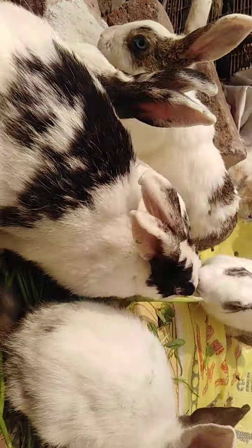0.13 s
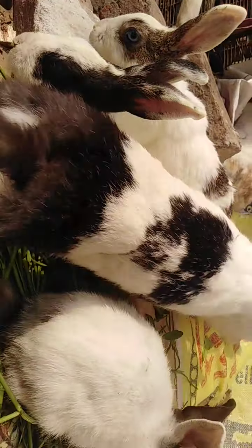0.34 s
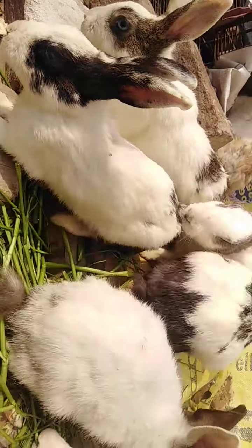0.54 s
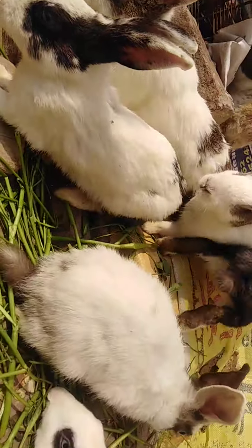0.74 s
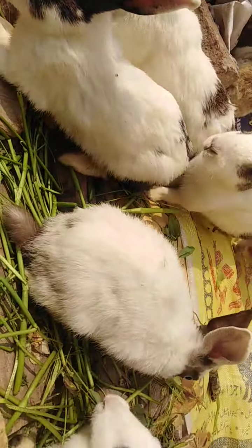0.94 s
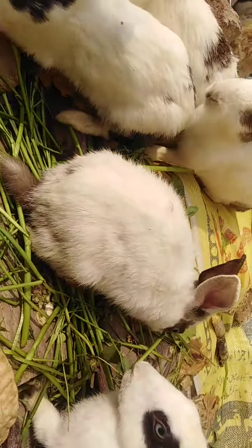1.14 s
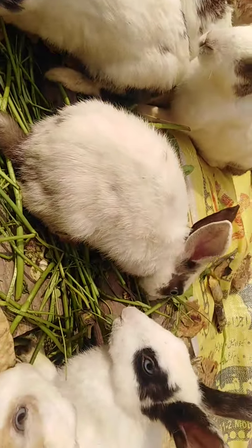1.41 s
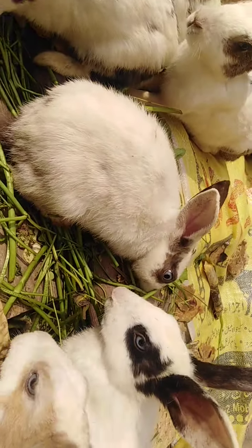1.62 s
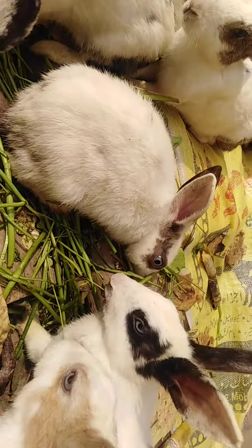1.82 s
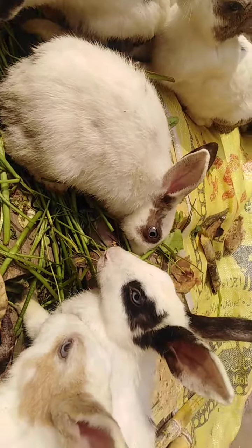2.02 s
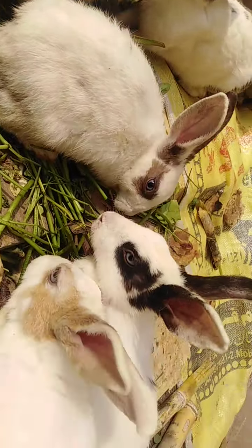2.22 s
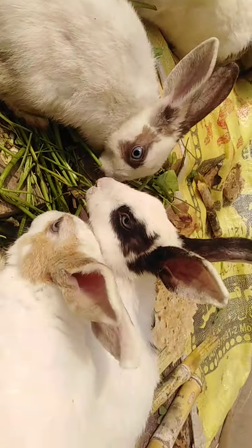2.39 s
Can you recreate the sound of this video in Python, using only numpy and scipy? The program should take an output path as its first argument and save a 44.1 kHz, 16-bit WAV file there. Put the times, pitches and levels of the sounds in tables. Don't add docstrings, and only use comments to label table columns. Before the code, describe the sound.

Rabbits chew and tear greens close by, with swishing leaves and crisp stalk cracks at 0.2 s. Around 0.5 s one hops, paws thudding and scuffing on a woven sack until about 0.7 s. Sparrows chirp left, in bursts near 0.7, 1.6 and 2.5 s, echoing off walls. Two snaps follow 1.0 s, a soft thud at 1.7 s; chewing fades over faint motor hum and traffic rumble.

```python
import sys
import numpy as np
from scipy import signal
from scipy.fft import rfft, irfft, next_fast_len
from scipy.io import wavfile
from scipy.ndimage import uniform_filter1d, map_coordinates

SR = 44100
rng = np.random.default_rng(int(sys.argv[2]) if len(sys.argv) > 2 else 0)


def makeup_ratio(level_db):
    decades = np.asarray(level_db, float) / 20
    return 10 ** decades


def bounce(signal):
    frames = np.transpose(np.atleast_2d(signal))
    limited = np.clip(frames, -1, 1)
    pcm = np.round(limited * 32767).astype(np.int16)
    wavfile.write(sys.argv[1], SR, pcm)


N = 112454


def unit(x):
    return x / np.sqrt(np.mean(x ** 2) + 1e-20)


def noise(*shape):
    return rng.standard_normal(shape)


def along(points, hz):
    point_hz, value = np.transpose(points)
    return np.interp(np.log(hz + 1), np.log(point_hz + 1), value)


def level_curve(rows):
    start_s, level_db = np.transpose(rows)
    return np.interp(np.arange(N) / SR, start_s, level_db, left=-120, right=-120)


def wobble(rate):
    return map_coordinates(noise(int(N * rate / SR) + 4), [np.arange(N) * rate / SR])


def filtered(x, response):
    size = next_fast_len(N + 8192)
    return irfft(rfft(x, size) * response(np.fft.rfftfreq(size, 1 / SR)), size)[..., :N]


def coloured(x, points):
    return filtered(x, lambda hz: makeup_ratio(along(points, hz)))


def smoothed(x, bins, frames):
    return uniform_filter1d(uniform_filter1d(x, bins, axis=-2), frames, axis=-1)


def patchy(x, patchy_db, wide=4, long=6):
    z = signal.stft(x, nperseg=512)[2]
    field = smoothed(noise(*z.shape[-2:]), wide, long)
    return signal.istft(z * makeup_ratio(patchy_db * unit(field)), nperseg=512)[1][..., :N]


def add(out, s, x):
    i = max(round(s * SR), 0)
    out[..., i:i + x.shape[-1]] += x[..., :out.shape[-1] - i]


def pan(left_over_right_db):
    return makeup_ratio(np.array([[left_over_right_db / 2], [-left_over_right_db / 2]]))


# (start_s, level_db)
HUM_LEVELS = [(0, -56.5), (.1, -49), (.15, -54), (.3, -47), (.44, -42.5), (.5, -48), (.75, -50),
              (.84, -50.5), (1.05, -44.5), (1.33, -50), (1.45, -65), (1.6, -93), (1.64, -49), (1.8, -47.5),
              (1.9, -56.5), (2.26, -68.5), (2.31, -49.5), (2.55, -61.5)]


def machine_hum():
    hum_hz, width_hz, fuzz_db, left_over_right_db = 386.5, 56.6, -2.5, 9
    t = np.arange(N) / SR
    tone = np.sqrt(2) * np.sin(2 * np.pi * hum_hz * t + 1.2 * wobble(14))
    tone = tone * makeup_ratio(2.5 * wobble(25))
    fuzz = unit(filtered(noise(N), lambda hz: np.exp(-((hz - hum_hz) / width_hz) ** 2)))
    return pan(left_over_right_db) * makeup_ratio(level_curve(HUM_LEVELS) - 7.0) * (tone + makeup_ratio(fuzz_db) * fuzz)


# (pitch_hz, level_db per Hz)
STREET_COLOUR = [(25, -14.5), (45, -7.5), (97, -1.5), (225, -11), (400, -8.5), (520, -35.5), (1700, -59),
                 (2600, -61)]


def street():
    hiss = noise(3, N)
    rumble = coloured(hiss[0] + 0.35 * hiss[1:], STREET_COLOUR)
    return makeup_ratio(-55) * unit(patchy(rumble, patchy_db=3, wide=2, long=12))


# (pitch_hz, level_db per Hz)
AIR_COLOUR = [(1000, 1.5), (4000, -13), (14000, -4)]


def air():
    return makeup_ratio(-69.5) * unit(patchy(coloured(noise(2, N), AIR_COLOUR), patchy_db=4, wide=10))


# (pitch_hz, time to fall 60 dB in s)
YARD_ECHO = [(1500, 0.54), (4500, 0.82), (8000, 0.34)]


def yard(events):
    left_late_s, echo_late_s, echo_db = 0.00027, 0.0034, 0
    out = np.zeros((2, N))
    for s, x in events:
        hz, t, z = signal.stft(noise(2, SR // 2), SR, nperseg=256)
        fading = makeup_ratio(-60 * t / along(YARD_ECHO, hz)[:, None])
        tail = signal.istft(z * fading, SR, nperseg=256)[1]
        tail = tail / np.linalg.norm(tail[0])
        add(out[0], s + left_late_s, x)
        add(out[1], s, x)
        add(out, s + echo_late_s, makeup_ratio(echo_db) * signal.fftconvolve(x[None], tail, axes=1))
    return out


# (start_s, pitch_hz, level_db)
KNOCK_EVENTS = [(0.284, 1043, -36.5), (0.746, 1967, -33.5), (.748, 765, -37), (1.38, 667, -46.5),
                (1.385, 1240, -45.5), (1.587, 2184, -39.5), (1.589, 1800, -52), (1.712, 1240, -54),
                (1.899, 1930, -48), (2.079, 1850, -47.5), (0.208, 883, -53), (.035, 1830, -63),
                (1.6, 2680, -39.5), (1.645, 2900, -38), (2.002, 1036, -46.5)]


def knocks():
    loss_db = 1.6
    t = np.arange(1800) / SR
    events = []
    for s, hz, db in KNOCK_EVENTS:
        swell = 1 - np.exp(-t * hz / 2)
        events.append((s, makeup_ratio(db - loss_db * t * hz) * swell * np.sin(2 * np.pi * hz * t)))
    return yard(events)


# (start_s, length_s, start_pitch_hz,
# end_pitch_hz, level_db)
SPARROW_NOTES = [(.0, 0.016, 5600, 3120, -33), (0.028, 0.046, 4695, 3230, -46),
                 (0.673, 0.019, 6690, 6430, -37), (0.689, 0.012, 4650, 5160, -33),
                 (0.701, 0.0165, 5960, 5360, -31), (0.713, 0.032, 5100, 3608, -39),
                 (0.746, 0.016, 4300, 5405, -35), (0.757, 0.025, 3050, 4174, -35.5),
                 (1.548, 0.012, 3250, 3340, -54), (1.564, 0.03, 3600, 5370, -45.5),
                 (1.582, 0.038, 4200, 4703, -38.5), (1.612, .05, 3686, 4290, -45),
                 (1.599, 0.044, 6800, 5960, -39), (1.615, 0.035, 4750, 5564, -34),
                 (1.651, 0.047, 5300, 3778, -36.5), (1.697, 0.038, 4250, 2795, -32),
                 (2.446, 0.023, 4900, 6194, -38), (2.479, 0.035, 5600, 4930, -42),
                 (2.508, .022, 3350, 4400, -41.5), (2.516, 0.025, 5790, 4360, -34),
                 (0.054, 0.017, 5300, 4940, -53), (0.924, 0.019, 3435, 3310, -42),
                  (0.919, 0.019, 3143, 2855, -44.5), (.948, 0.041, 3050, 2480, -44),
                  (1.078, 0.039, 3830, 3570, -42), (1.089, 0.036, 3293, 2915, -41),
                  (1.12, 0.059, 4156, 5380, -43.5), (1.277, 0.04, 5050, 4960, -44.5),
                  (1.298, 0.049, 4850, 3830, -47.5), (1.341, 0.044, 5300, 4270, -46),
                  (1.397, 0.052, 5100, 4285, -52.5), (0.803, 0.054, 4200, 3320, -49.5),
                  (1.763, 0.044, 5160, 5530, -46), (1.9, 0.033, 6010, 4016, -39.5),
                  (1.911, 0.034, 3700, 4937, -41), (2.013, 0.0278, 3455, 2842, -41),
                  (2.025, 0.11, 4926, 4177, -46), (2.063, 0.044, 3046, 3537, -43),
                  (2.091, 0.11, 5370, 5026, -43.5), (2.201, 0.043, 4720, 5795, -45.5),
                  (2.337, 0.06, 3350, 2933, -54), (2.407, 0.053, 3240, 2880, -56)]


def sparrows():
    full_voice_db = -39
    second_ratio, second_db, overtone_db = 0.83, -6.5, -24
    rasp = makeup_ratio(4 * np.tanh(wobble(110)))
    warble = 0.055 * wobble(500)
    notes = []
    for s, length, start_hz, end_hz, db in SPARROW_NOTES:
        now = slice(int(s * SR), int((s + length) * SR))
        u = np.linspace(0, 1, len(rasp[now]))
        effort = min(makeup_ratio(db - full_voice_db), 1)
        hz = (start_hz + (end_hz - start_hz) * u) * (1 + effort * warble[now])
        phase = 2 * np.pi * np.cumsum(hz) / SR
        voice = np.sin(phase) + makeup_ratio(overtone_db) * np.sin(2 * phase)
        voice = voice + effort * makeup_ratio(second_db) * np.sin(second_ratio * phase)
        swell = np.abs(np.sin(np.pi * u)) ** 0.51
        notes.append((s, makeup_ratio(db) * rasp[now] * swell * voice))
    return yard(notes) * pan(7)


# (start_s, peak level_db, pitch_hz, time to fall 60 dB in s, left over right in dB)
PAW_THUDS = [(0, -40, 201.3, 0.42, -20.5), (0.021, -38, 132, 0.22, -14.5), (0.436, -22, 102, 0.096, -4),
             (0.497, -37, 122, 0.04, -9), (0.536, -10, 452, 0.021, -5), (0.543, -8.5, 433, 0.022, 1.5),
             (.553, -36.5, 546, 0.042, -24), (0.576, -33.5, 401, 0.19, 4), (0.598, -28.5, 195, 0.063, -12),
             (.625, -34, 242, 0.29, -2), (0.647, -29.5, 192, 0.11, -8), (0.872, -33, 106, 0.13, 1),
             (0.962, -38.5, 106, 0.17, 2), (1.3, -38.5, 107.8, 0.23, 15), (1.665, -37.5, 195.7, 0.21, 2),
             (1.731, -15, 113, 0.04, 4), (1.787, -42, 317.7, 0.22, 3.5), (2.14, -42, 273.6, 0.32, -4)]


def paw_thuds():
    out, t = np.zeros((2, N)), np.arange(SR // 3) / SR
    for s, db, hz, t60, left_over_right_db in PAW_THUDS:
        wander = uniform_filter1d(np.cumsum(noise(len(t))), size=int(SR / hz))
        drift = 0.5 * wander * np.sqrt(hz / SR)
        swell = 1 - np.exp(-t * hz * 0.82)
        thud = makeup_ratio(db - 60 * t / t60) * swell * np.sin(2 * np.pi * hz * t + drift)
        add(out, s, pan(left_over_right_db) * thud)
    return out


# (start_s, level_db)
SCUFF_LEVELS = [
    (.24, -64.5),
    (.33, -55.5),
    (.42, -49.5),
    (.49, -45.5),
    (.55, -38.5),
    (.64, -43),
    (.7, -54),
    (.95, -58.5),
    (1.1, -69),
    (1.25, -82),
]
# (pitch_hz, level_db per Hz)
SACK_COLOUR = [(50, -3.5), (110, 1), (400, 0), (600, -11), (2500, -21.5), (4000, -39)]


def sack_scuffs():
    hiss = noise(3, N)
    scuff = unit(coloured(hiss[0] + 0.6 * hiss[1:], SACK_COLOUR))
    return scuff * makeup_ratio(level_curve(SCUFF_LEVELS) + 2.5 * np.tanh(wobble(70)))


# (start_s, peak level_db, pitch_hz, cycles to die)
STALK_SNAPS = [(0.1972, -20.5, 5740, 6.3), (0.2015, -14, 6300, 5), (0.2038, -11, 7030, 1.7),
               (0.435, -52.5, 1146, 41), (0.5047, -40, 2570, 2.4), (0.537, -21, 1020, 2.46),
               (.5425, -29.5, 894, 2.9), (.552, -27.5, 1810, 2.6), (.567, -30, 2400, 2.3),
               (.598, -43, 960, 3.2), (.636, -63, 7000, 2.4), (.748, -35.5, 1990, 7.2),
               (0.823, -30, 6940, 5.6), (1.0248, -18.5, 8600, 2.35), (1.044, -19, 6200, 2.8),
               (1.161, -38.5, 8800, 0.94), (2.11, -35.5, 10200, 7.4)]


def snaps():
    crack_db, crack_t60_s = -19.5, 0.0014
    out, t = np.zeros((2, N)), np.arange(600) / SR
    for s, db, hz, cycles in STALK_SNAPS:
        swell = 1 - np.exp(-t * hz * 0.5)
        ring = np.sin(2 * np.pi * hz * t) * makeup_ratio(-20 * t * hz / cycles) * swell
        crack = np.diff(noise(2, len(t) + 1)) * makeup_ratio(crack_db - 60 * t / crack_t60_s)
        add(out, s, makeup_ratio(db + 12.0) * (ring * [[1], [0.7]] + crack))
    return out


# (peak start_s, rise_s, time to fall 60 dB in s, level_db, stalk body over leaf in dB)
GREEN_BITES = [(0, .01, 0.46, -51.5, 2), (0.146, 0.0078, 0.32, -49.5, -6.5),
               (0.202, 0.0095, 0.47, -45, -1.5), (0.344, 0.07, 0.63, -38, 1.5),
               (0.433, 0.0062, 0.83, -46, 5), (0.507, 0.0068, 0.11, -36, 2.5), (0.56, 0.015, 0.22, -44, 4),
               (0.641, 0.023, 0.85, -40.5, -2), (0.839, 0.043, 0.78, -45, -3.5), (.95, 0.27, 1, -51.5, 0.5),
               (1.044, 0.044, 0.48, -42.5, 2), (1.164, 0.0056, 0.29, -47.5, -7),
               (1.255, 0.019, 0.24, -39.5, -3.5), (1.469, 0.022, 0.67, -54, -9),
               (1.705, 0.03, 0.32, -44, -4), (1.897, 0.015, 0.44, -45, 0), (1.93, 0.025, 0.12, -55, 1),
               (2.116, 0.006, 0.43, -52.5, -3.5), (2.215, 0.0075, 0.54, -57.5, 6),
               (2.489, 0.026, 0.88, -63.5, 13)]
# (pitch_hz, level_db per Hz)
LEAF_COLOUR = [(5500, -21), (7000, -2), (8500, 0.5), (11500, -1), (14300, 0)]
# (pitch_hz, level_db per Hz)
STALK_COLOUR = [(900, -54), (1700, -13), (3000, -1), (6000, -0.5), (8000, -10), (10000, -91.5)]


def bites():
    grains_per_s, grain_spread_db, grain_db = 2500, 2, -5
    t, leaf_power, stalk_power = np.arange(N) / SR, 0, 0
    for s, rise, t60, db, body_db in GREEN_BITES:
        rising = np.exp(-((t - s) / rise) ** 2)
        dying = makeup_ratio(-60 * np.abs(t - s) / t60) ** 2
        power = makeup_ratio(2 * db) * np.where(t < s, rising, dying)
        leaf_power = leaf_power + power
        stalk_power = stalk_power + power * makeup_ratio(2 * body_db)
    hit = rng.random((2, N)) < grains_per_s / SR
    grains = hit * noise(2, N)
    grains = unit(grains * makeup_ratio(grain_spread_db * rng.exponential(size=(2, N))))
    fibres = patchy(noise(2, N) + makeup_ratio(grain_db) * grains, patchy_db=4.0, wide=39)
    leaf = unit(coloured(fibres, LEAF_COLOUR)) * np.sqrt(leaf_power) * pan(-4.5)
    stalk = unit(coloured(fibres, STALK_COLOUR)) * np.sqrt(stalk_power) * pan(3)
    return (leaf + stalk) * makeup_ratio(0.31 * wobble(40.96))


def scene():
    birds_and_chewing = sparrows() + bites() + snaps()
    hop = paw_thuds() + sack_scuffs()
    background = machine_hum() + street() + air()
    return birds_and_chewing + hop + background + knocks()


def top_cut(x):
    return signal.sosfilt(signal.butter(12, 15620, fs=SR, output="sos"), x)


def record(dry):
    top_hz, above_top_db, low_cut_hz = 14350, -55, 45
    gate_db, gate_depth_db = -96, -30
    mask_db, mask_above_hz = -11.5, 2300

    def band_limits(hz):
        low_cut = hz ** 2 / (hz ** 2 + low_cut_hz ** 2)
        return np.where(hz < top_hz, 1, makeup_ratio(above_top_db)) * low_cut

    hz, _, z = signal.stft(filtered(dry, band_limits), SR, nperseg=512)
    power = smoothed(np.abs(z) ** 2, 3, 7)
    neighbours = makeup_ratio(2 * mask_db) * smoothed(power, 29, 9) * (hz[:, None] > mask_above_hz)
    threshold = makeup_ratio(2 * gate_db) + np.abs(neighbours)
    gain = np.maximum(1 - (threshold / (np.abs(power) + 1e-20)) ** 2, makeup_ratio(gate_depth_db))
    mix = signal.istft(z * gain, nperseg=512)[1][:, :N]
    return top_cut(mix)


dry = scene()
out = record(dry)
bounce(out)
```